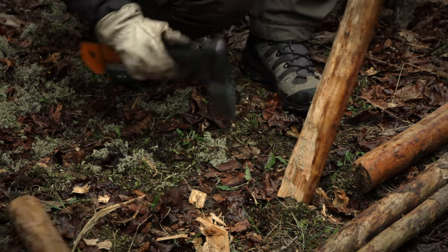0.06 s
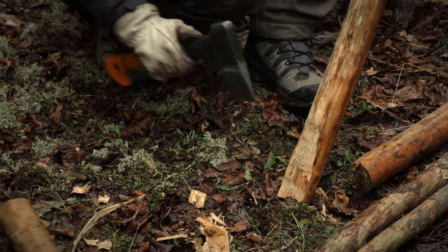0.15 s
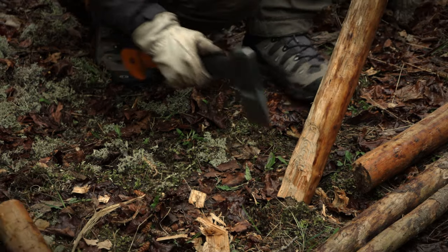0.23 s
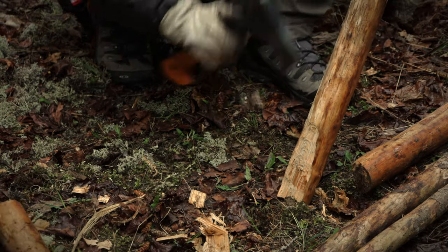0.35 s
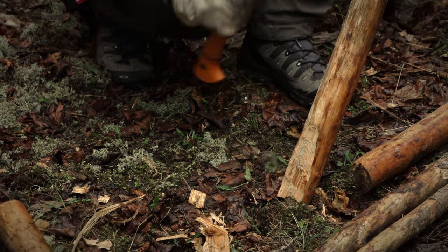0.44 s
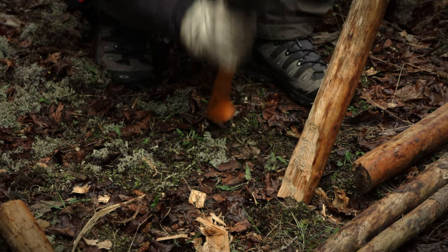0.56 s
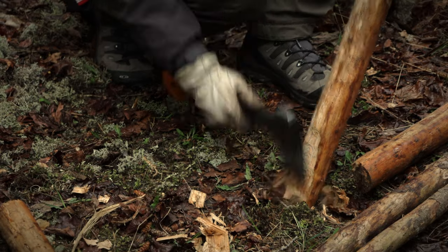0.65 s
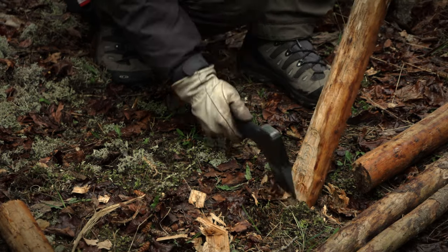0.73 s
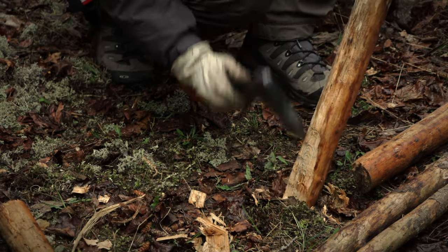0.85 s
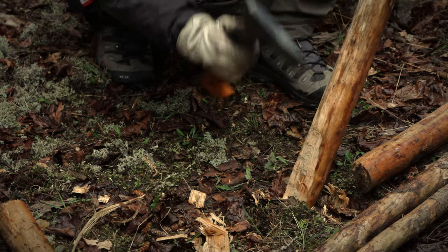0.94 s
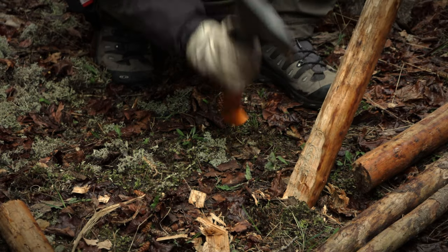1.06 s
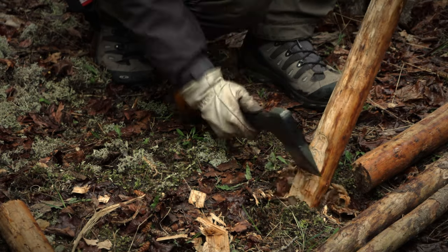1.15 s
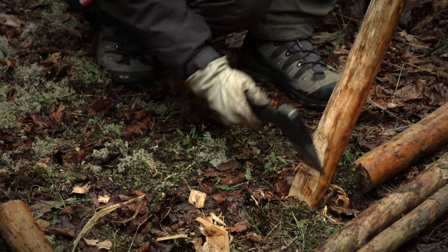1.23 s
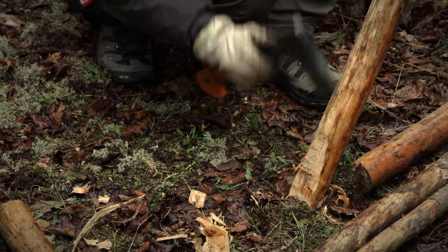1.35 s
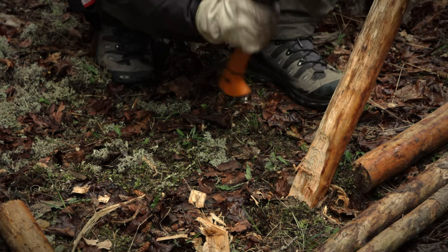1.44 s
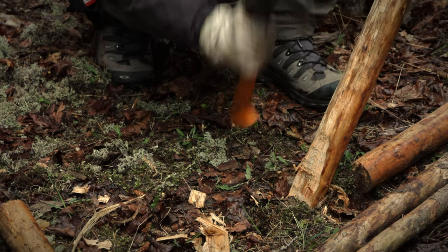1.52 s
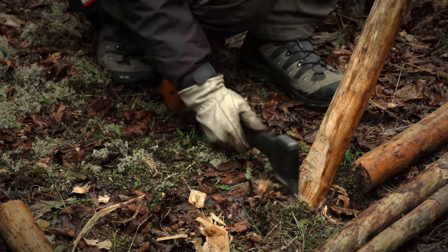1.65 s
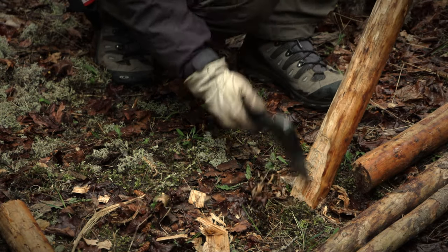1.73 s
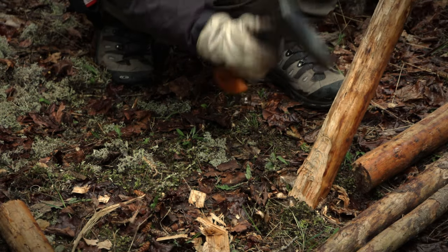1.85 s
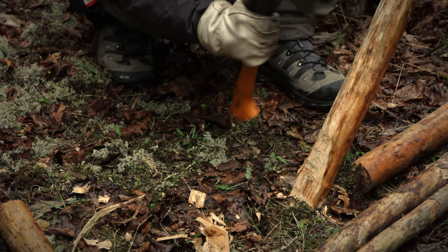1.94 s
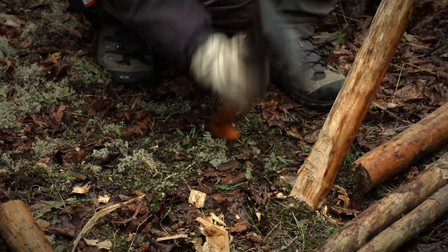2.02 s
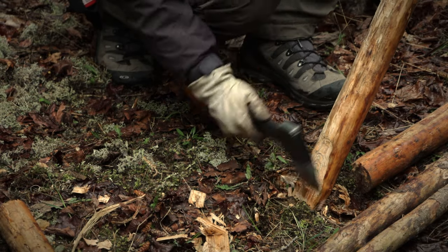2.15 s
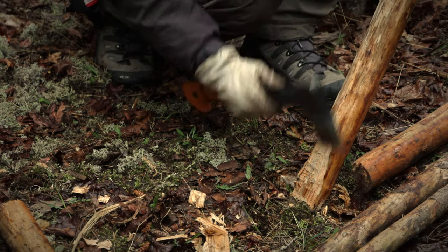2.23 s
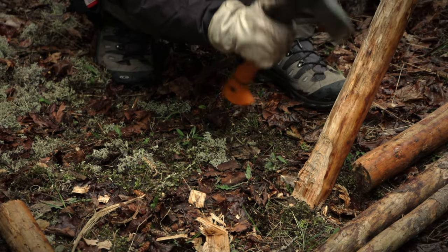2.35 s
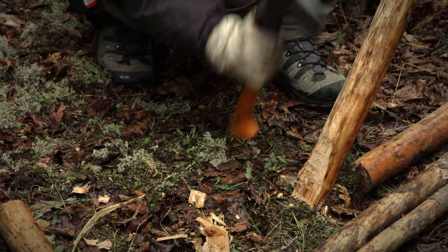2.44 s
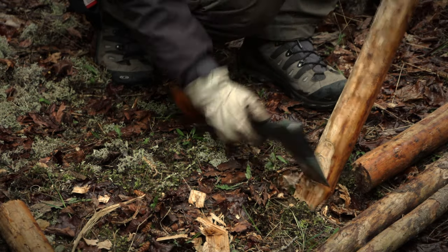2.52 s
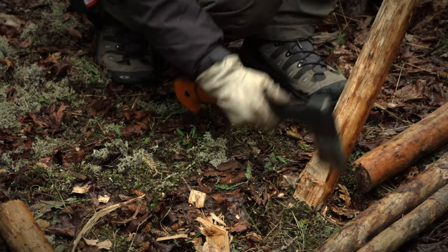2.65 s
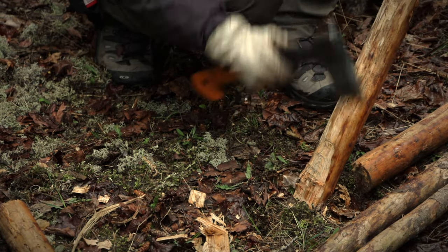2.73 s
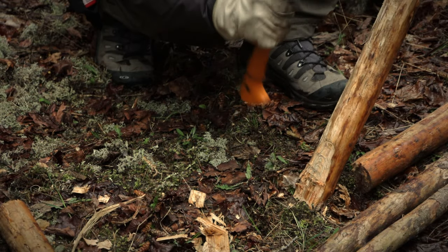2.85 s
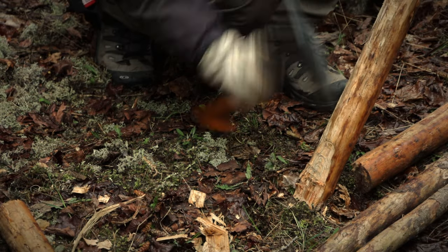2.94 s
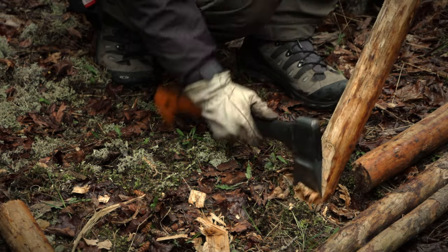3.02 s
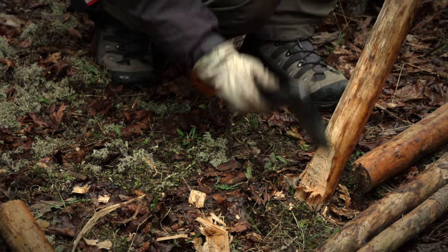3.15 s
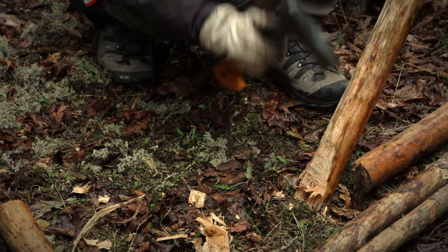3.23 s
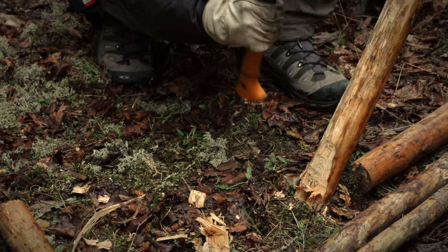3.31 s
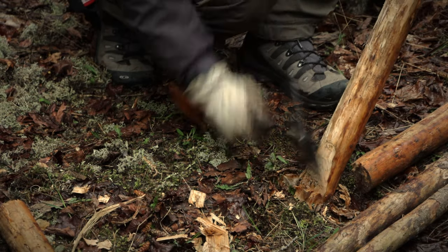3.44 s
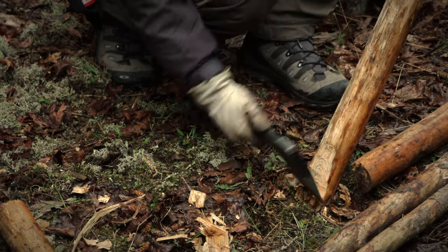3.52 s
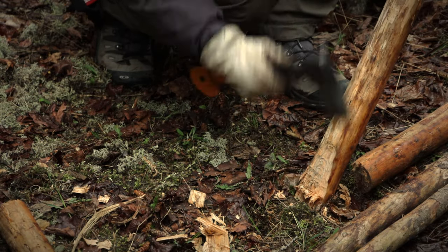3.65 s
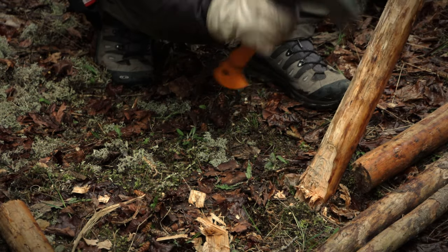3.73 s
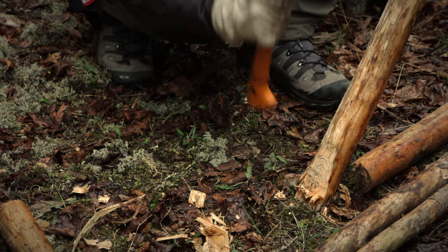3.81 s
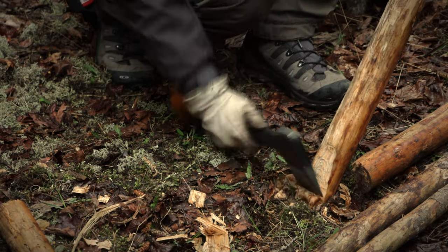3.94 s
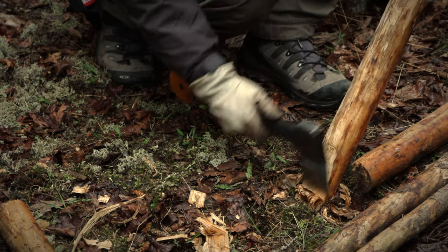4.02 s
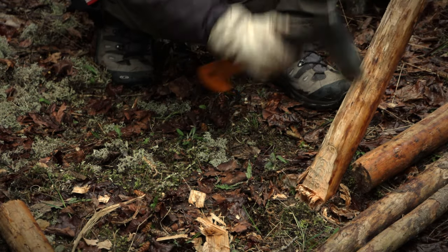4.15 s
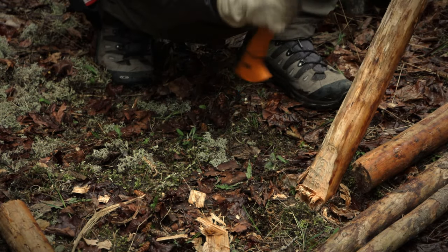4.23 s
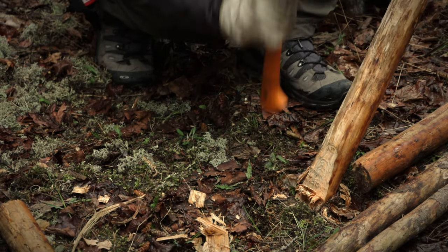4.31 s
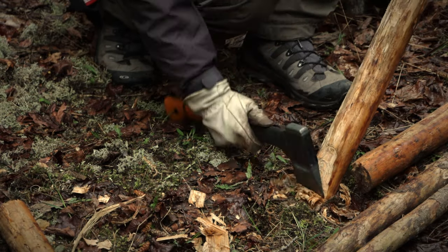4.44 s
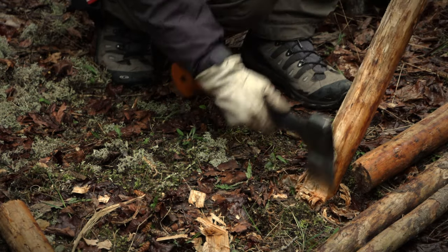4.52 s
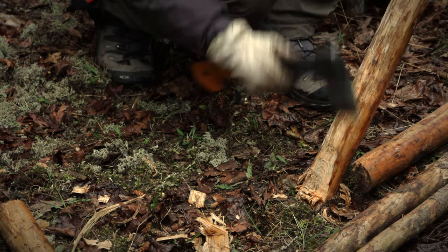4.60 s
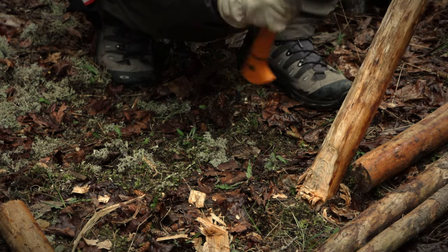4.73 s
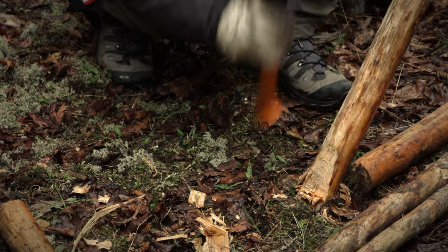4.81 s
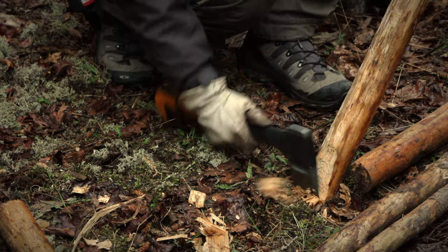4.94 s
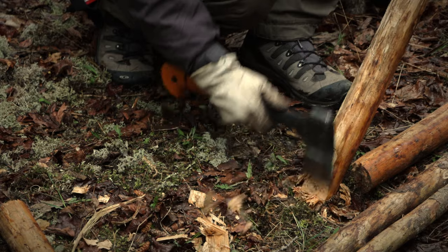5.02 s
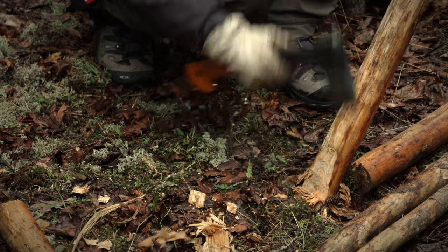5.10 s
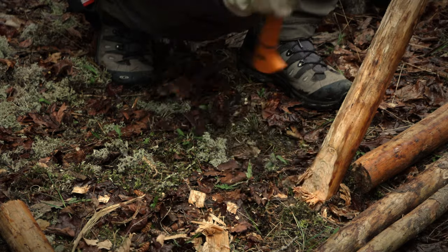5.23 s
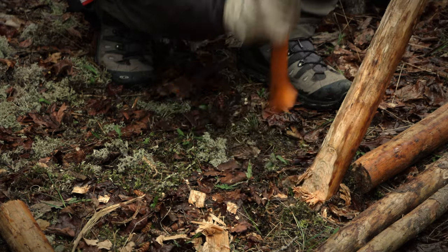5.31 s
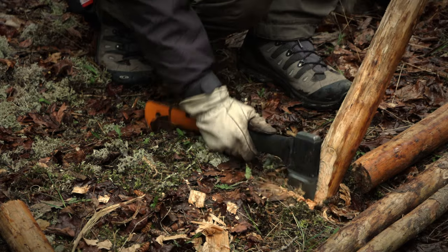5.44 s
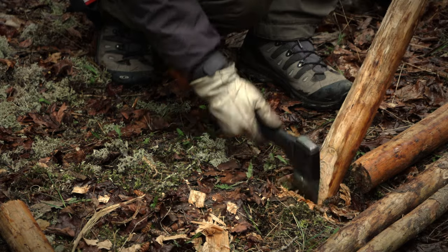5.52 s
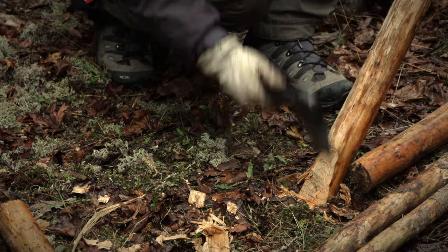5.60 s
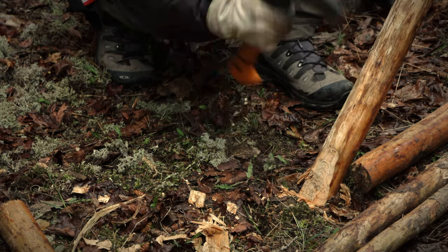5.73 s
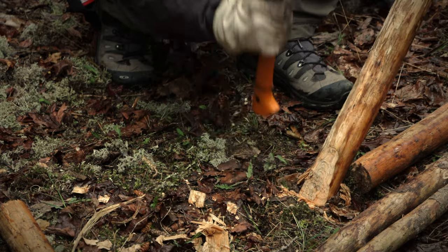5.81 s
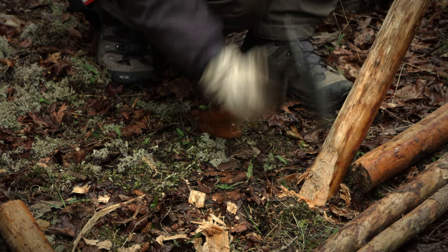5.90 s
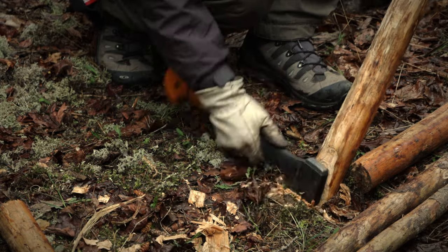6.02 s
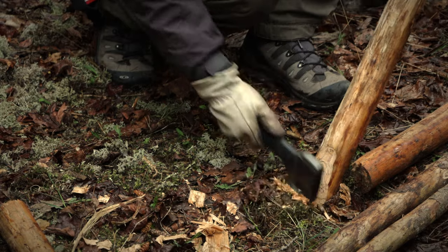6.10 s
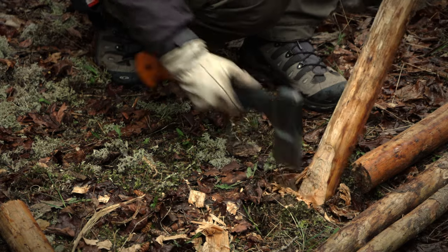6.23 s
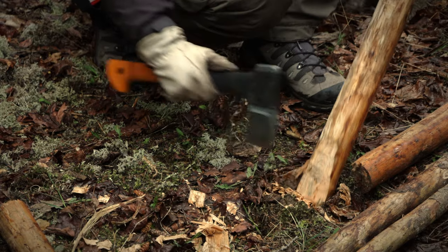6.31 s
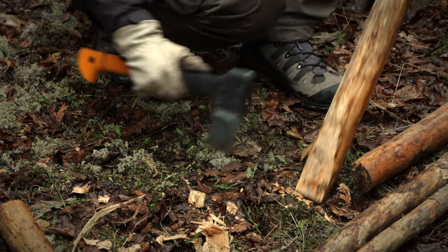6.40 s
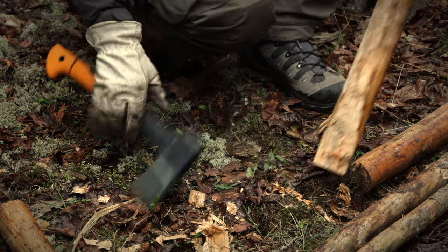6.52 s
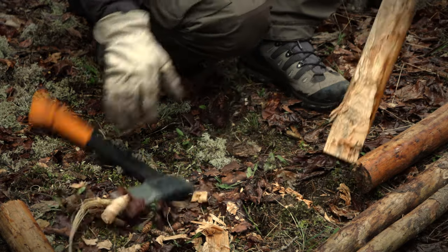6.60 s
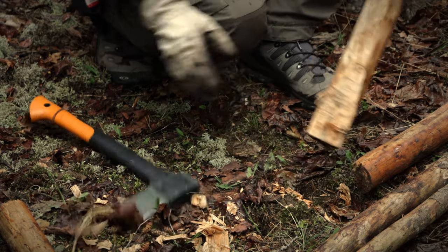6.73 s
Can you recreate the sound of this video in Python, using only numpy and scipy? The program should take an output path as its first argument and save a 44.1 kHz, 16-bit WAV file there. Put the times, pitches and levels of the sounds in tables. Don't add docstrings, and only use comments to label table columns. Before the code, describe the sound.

A quiet forest, heard from about a metre away: soft wind in the crowns and a barely audible low motor far off, mostly at the start and end. Sleeve and leaves rustle until 0.4 s, with a few chip ticks. The first, weaker chop lands at 0.7 s, then eleven stronger ones at nearly even half-second spacing, from 1.2 to 6.0 s. Each is a sharp, dry crack of tearing fibres on a short, choked wooden knock with a small ground thud, varying in pitch and brightness; a brief diffuse echo returns from the trees. Between blows chips tick on dry leaves, air swishes faintly, and the edge briefly scrapes bark, most clearly just before the last blow. Around 6.25 s cloth and leaves rustle; at 6.65 s the hatchet drops with a leafy crunch and dull low bumps, rocking and settling by 6.75 s.

```python
import sys
import numpy as np
from scipy import signal
from scipy.fft import rfft, irfft
from scipy.io import wavfile
from scipy.ndimage import uniform_filter1d

SR = 44100
rng = np.random.default_rng(int(sys.argv[2]) if len(sys.argv) > 2 else 0)


def digitize_waveform(pressure):
    field = np.atleast_2d(pressure).T
    bounded = np.clip(field, -1, 1)
    quanta = np.round(bounded * 32767).astype(np.int16)
    wavfile.write(sys.argv[1], SR, quanta)


def invert_db(x):
    u = np.asarray(x, float) / 20
    return 10 ** u


N = 298116

# pitch_hz, level_db (per Hz)
WIND_COLOUR = [(14, -22), (30, -10), (60, -5.5), (122, -3), (210, -7), (330, -4.5), (740, -2.5), (1050, -5),
               (1500, -12), (4000, -17), (8600, -19), (9600, -22.5), (14800, -23.5), (16500, -37.5)]
WIND_DB = -55
# time_s, level_db
MOTOR_LEVELS = [(0, -69), (.7, -66.5), (1.3, -82), (3, -87), (5.8, -91), (6.4, -67.5), (6.76, -64)]
MOTOR_HZ = 124
# pitch_hz, level_db
TREELINE_COLOUR = [(500, -19), (1100, -0.5), (1450, -5), (1750, 2), (2100, -11), (2900, -12), (3300, -3),
                   (3800, -21.5)]
TREELINE_DB, TREELINE_LATE_S, TREELINE_SPREAD_S = -55.5, 0.098, 0.047
# pitch_hz, level_db
ECHO_COLOUR = [(150, 3), (500, 9), (1700, 3), (4000, -0.5), (9000, -5.5), (15000, -26)]
ECHO_DB, ECHO_NOTE_DB, ECHO_T60_S = -43, -7, 0.39
ECHO_FOLLOWS = 0.19
# loudest_s, level_db, rise_s (by 20 dB), sink_s (by 20 dB), top_db (relative)
RUSTLES = [(.005, -52, .05, 0.03, -3.5), (.175, -54, -0.08, -0.04, -2), (.262, -47.5, 0.13, .11, -9),
           (.335, -61, 0.3, 0.3, -2), (6.22, -51.5, 0.26, 0.17, -17), (6.265, -43, 0.18, .018, -3),
           (6.39, -55, 0.05, 0.23, -6), (6.55, -57.5, 0.05, .15, -4)]
# loudest_s, level_db, rise_s, sink_s, top_db
DROP = [
    (6.654, -39, 0.023, 0.055, -3),
    (6.677, -38.5, 0.032, 0.023, -8),
    (6.72, -39.5, 0.0065, 0.03, -2),
]
# start_s, peak_db, pitch_hz, t60_s
BUMPS = [(5.948, -40.5, 306, 0.037), (5.958, -42, 175, .06), (6.657, -43, 75, 0.16),
         (6.681, -37, 80.3, 0.2), (6.729, -39, 105, 0.11)]
# start_s, peak_db, pitch_hz
CHIPS = [(0.015, -43, 1000), (0.0835, -41, 1530), (0.298, -33, 6900), (0.573, -40.5, 2970),
         (0.618, -43, 8400), (0.6713, -40, 6280), (0.688, -38, 8400), (1.5237, -40.5, 2180),
         (1.5843, -43.5, 2030), (1.822, -42, 4410), (1.892, -42, 6430), (2.0194, -38.5, 3770),
         (2.1195, -36, 8000), (2.3451, -40.5, 2600), (2.7614, -40.5, 1510), (2.9376, -43, 2240),
         (3.0001, -44, 4500), (3.316, -43, 3130), (3.7737, -42.5, 5120), (3.8887, -39.5, 6700),
         (4.196, -40, 6100), (4.2666, -44, 2820), (4.8495, -43.5, 2600), (5.1933, -38, 3300),
         (5.2034, -37.5, 9800), (5.3175, -31, 4030), (5.3294, -41.5, 1600), (5.4408, -39, 2020),
         (5.7735, -43, 6460), (5.8408, -35, 2910)]
# pitch_hz, level_db
CHIP_SHELF = [(300, 0), (8700, 0), (9700, -8), (20000, -10)]
# start_s, level_db, change_db (by the blow), top_db (relative)
SCRAPES = [(1.1965, -42, -9, -1.5), (2.129, -49, -0.5, 3), (2.567, -42, -3, -2.5), (5.442, -58, -5, 1),
           (6.012, -56, 7, 2), (6.0301, -37.5, 17, -4)]
SCRAPE_RING_HZ, SCRAPE_RING_DB = 1200, -7
# pitch_hz, level_db
SWISH_COLOUR = [(600, -8), (1100, 0), (1900, -4), (2800, -7), (4500, -11)]
SWISH_DB, SWISH_RISE_S = -55.5, 0.11

# start_s, strength_db, place (along the pole, 0-1), ground_db, hum_db
BLOWS = [(0.723, -26, 0.23, -46, -45.5), (1.22, -16.5, .97, -32, -38.5), (1.683, -16, 0.49, -30, -43.5),
         (2.161, -22.5, 0.57, -23.5, -40), (2.606, -15.5, 0.66, -21, -37), (3.066, -16, 0.09, -42, -53),
         (3.542, -13.5, .47, -18.5, -37), (4.016, -13, 0.72, -46, -36), (4.5, -12.5, 0.96, -20.5, -41),
         (4.984, -13, 0.48, -27, -38.5), (5.504, -14.5, 0.58, -32, -44), (6.033, -11, .87, -27, -46.5)]
# crack_db, cut_ms, die_s, slip_ms (first slip), splinter_hz
CUTS = [(-10, 1.7, .075, 9.3, 6500), (-1.5, 2.55, 0.019, 2.43, 3080), (-6.5, 1.4, 0.063, 3.85, 8600),
        (-5, 2.05, 0.03, 3.34, 7100), (-5.5, 1.7, 0.031, 1.92, 3420), (-10, 2.3, 0.042, 2.61, 2850),
        (-4, 2.5, .028, 4, 6600), (-5.5, 2.2, .028, 5, 1570), (-2.5, 3, .038, 3.66, 2800),
        (-13, 8.6, 0.046, 3.22, 1570), (-5, 4, 0.036, 3.26, 2070), (-6, 3, 0.038, 5.3, 3280)]
# pitch_hz, level_db, t60_s
LOW_BEND = [(318, 0, 0.061), (381, -1, 0.043), (480, -10, 0.1)]
MIDDLE_BEND = [(645, -3.5, 0.041), (558, -3, 0.016), (762, -8.5, 0.046)]
HIGH_BENDS = [(858.4, 6.5, 0.049), (995, 9.5, 0.05)]
UPPER_BENDS = [(1168, 2, 0.047), (1344, 5.5, 0.052), (1450, -7, 0.025), (1767, 0.5, 0.041)]
# pitch_hz, level_db, t60_s
GROUND = [(151.3, -0.5, 0.19), (186, 0, 0.061), (122, -6.5, 0.067)]
DEEP_GROUND = [(92, 0, 0.23)]
FOOT = [(191, 0, 0.21)]
BEND_DB = [.5, 5, 0.8, -1.6]
NODE_LEAK = 0.11
DEEP_DB, FOOT_DB = -40, -33
SLIP_SHARE, LAST_SLIP_LATER, LAST_SLIP_SHARE = 0.37, 2.296, 0.27
HUM_HZ, HUM_T60_S = 247, 0.4
# pitch_hz, level_db (per Hz)
FIBRES = [(450, -11.5), (900, 6.5), (1600, -0.5), (2900, 1), (4500, -1), (6000, -9)]
# pitch_hz, level_db (per Hz)
FIBRE_TOPS = [(4000, -19), (6300, -4.5), (8200, -2), (9500, -12.5), (13500, -7), (16000, -31)]
SPLINTER_DB = -3
TOP_DB, DULLER_DB_PER_S = -6.5, -1.35
THIN_HZ = 105
LIMIT = 0.6


def colour(x, points):
    hz, db = np.transpose(points)
    f = np.maximum(np.arange(len(x) // 2 + 1) * SR / len(x), 1)
    gain_db = np.interp(np.log(f), np.log(hz), db, left=db[0] - 37, right=db[-1] - 11)
    y = irfft(rfft(x) * invert_db(gain_db), len(x))
    return y / np.sqrt(np.mean(y ** 2))


def fade(size, t60):
    return np.exp(-np.log(1000) * np.arange(size) / SR / max(t60, 0.002))


def ring(modes, size, detune):
    t = np.arange(size) / SR
    out = np.zeros(size)
    for (hz, db, t60), factor in zip(modes, detune):
        out += invert_db(db) * fade(size, t60) * np.sin(2 * np.pi * hz * factor * t)
    return out


def add(out, s, x):
    i = int(s * SR)
    out[i:i + len(x)] += x[:N - i]


def peak(x, db):
    return x * invert_db(db) / np.max(np.abs(x))


def walk(rate):
    k = int(SR / rate)
    steps = np.repeat(rng.standard_normal(N // k + 1), k)
    return 1.46 * uniform_filter1d(uniform_filter1d(steps, k), k)[:N]


def crackle(size, spiky_db):
    return rng.standard_normal(size) * invert_db(spiky_db * rng.exponential(size=size))


def note(hz, db, size):
    band = [(hz * 0.7, -20), (hz * 0.94, 0), (hz * 1.06, 0), (hz * 1.4, -20)]
    return invert_db(db) * colour(crackle(size, 3.0), band)


def wind():
    spectrum = rfft(colour(rng.standard_normal(N), WIND_COLOUR))
    f = np.maximum(np.arange(N // 2 + 1) * SR / N, 1)
    swell_db = 0.4 * walk(0.8)
    out = np.zeros(N)
    for hz in 20 * 2.0 ** np.arange(11):
        share = np.maximum(1 - np.abs(np.log2(f / hz)), 0)
        out += irfft(spectrum * share, N) * invert_db(swell_db + 0.24 * walk(6.5))
    return invert_db(WIND_DB) * out


def far_motor():
    s, db = np.transpose(MOTOR_LEVELS)
    level = invert_db(np.interp(np.arange(N) / SR, s, db) + 2.0 * walk(6))
    pitch_hz = MOTOR_HZ * (1 + 0.011 * walk(4))
    return np.sqrt(2) * level * np.sin(2 * np.pi * np.cumsum(pitch_hz) / SR)


def treeline():
    t = np.arange(SR // 4) / SR
    blur = np.exp(-((t - TREELINE_LATE_S) / TREELINE_SPREAD_S) ** 2 / 2)
    level = np.zeros(N)
    for s, strength_db, *_ in BLOWS:
        add(level, s, invert_db(TREELINE_DB + strength_db + 12) * blur)
    return level * colour(crackle(N, 1.7), TREELINE_COLOUR)


def echo(strength_db, splinter_hz, size):
    wash = colour(rng.standard_normal(size), ECHO_COLOUR) + note(splinter_hz, ECHO_NOTE_DB, size)
    rise = np.minimum(np.arange(size) / SR / 0.009, 1)
    return invert_db(ECHO_DB + ECHO_FOLLOWS * (strength_db + 15)) * rise * fade(size, ECHO_T60_S) * wash


def rubbing():
    low_points = [(300, -15), (700, 0), (1500, 1.0), (3600, -0.5), (6000, -4), (8000, -7.0)]
    high_points = [(4500, -25), (6500, -1.5), (8500, -2.0), (10000, -8.5), (15500, -9.5)]
    low = colour(crackle(N, 2.0), low_points)
    high = colour(crackle(N, 1.4), high_points)
    bark = low + note(SCRAPE_RING_HZ, SCRAPE_RING_DB, N)
    out, t = np.zeros(N), np.arange(N) / SR
    for s, db, rise_s, sink_s, top_db in RUSTLES + DROP:
        level = invert_db(db - 20 * np.maximum((s - t) / rise_s, (t - s) / sink_s))
        out += level * (low + invert_db(top_db) * high)
    for s, db, change_db, top_db in SCRAPES:
        bite_s = min(blow[0] for blow in BLOWS if blow[0] > s)
        level = invert_db(np.interp(t, [s, bite_s], [db, db + change_db], left=-150, right=-150))
        out += level * (bark + invert_db(top_db) * high)
    return out * invert_db(1.4 * walk(300))


def bumps():
    out = np.zeros(N)
    for s, db, hz, t60 in BUMPS:
        body = ring([(hz, 0, t60), (hz * 2.34, -8, t60 * 1.1)], 8192, [1, 1])
        push = np.hanning(int(SR / hz / 3))
        add(out, s, peak(np.convolve(push, body), db))
    return out


def chips():
    out = np.zeros(N)
    faint = rng.random((220, 3)) * [N / SR, 9, 2.2] + [0, -56, 0]
    faint[:, 2] = 2000 * 2 ** faint[:, 2]
    for s, db, hz in list(CHIPS) + list(faint):
        band = [(hz / 3, -16), (hz, 0), (hz * 2.48, -13)]
        spit = colour(colour(rng.standard_normal(512), band), CHIP_SHELF)
        add(out, s, peak(spit * fade(512, 0.02), db))
    return out


def swishes():
    t = np.arange(SR // 4) / SR
    level = np.zeros(N)
    for s, *_ in BLOWS:
        add(level, s - 1 / 4, invert_db(SWISH_DB - 20 * t[::-1] / SWISH_RISE_S))
    return level * colour(rng.standard_normal(N), SWISH_COLOUR)


def jolts(slip_ms):
    force = np.zeros(1024)
    slip = slip_ms * SR / 1000
    force[[0, int(slip), int(slip * LAST_SLIP_LATER)]] = 1, SLIP_SHARE, LAST_SLIP_SHARE
    return np.convolve(force, np.hanning(22))


def wood_and_ground(strength_db, place, ground_db, slip_ms, size):
    t = np.arange(size) / SR
    force = jolts(slip_ms)
    shape = np.abs(np.sin(np.pi * (np.arange(1, 5) * place + 1 / 4)))
    bend_db = strength_db + np.array(BEND_DB) + 20 * np.log10(shape + NODE_LEAK)
    groups = LOW_BEND, MIDDLE_BEND, HIGH_BENDS, UPPER_BENDS, GROUND, DEEP_GROUND, FOOT
    out = np.zeros(size)
    for modes, db in zip(groups, [*bend_db, ground_db, DEEP_DB, FOOT_DB]):
        lowest_hz = modes[0][0]
        detune = 1 + 0.008 * rng.standard_normal(len(modes))
        swing = signal.fftconvolve(force, ring(modes, size, detune))[:size]
        high_pass = signal.butter(2, 0.37 * lowest_hz, "high", fs=SR, output="sos")
        swing = signal.sosfilt(high_pass, swing)
        if lowest_hz > 100:
            swing = swing * (0.1 + 0.9 * np.exp(-(t * (lowest_hz / 600) ** 0.3 / 0.018) ** 2))
        out += peak(swing, db + 5.5)
    return out


def tearing(out, s, crack_db, cut_ms, die_s, splinter_hz, size):
    t = np.arange(size) / SR
    tear = np.minimum(t / 0.001, 1)
    tear = tear * np.exp(-np.log(1000) * np.maximum(t - cut_ms / 1000, 0) / die_s)
    add(out, s + 0.001, invert_db(crack_db - 13) * tear * note(splinter_hz, SPLINTER_DB, size))
    tear = tear + invert_db(-24.0) * fade(size, 0.21)
    bursts = np.interp(t, np.arange(500) / 1000, invert_db(3.5 * rng.standard_normal(500) - 1.5))
    body = tear * bursts * colour(crackle(size, 2.53), FIBRES)
    top = tear ** 1.055 * bursts * colour(crackle(size, 3.3), FIBRE_TOPS)
    top_db = crack_db + TOP_DB + DULLER_DB_PER_S * s
    add(out, s + 0.0004, invert_db(crack_db - 9.5) * body + invert_db(top_db - 1.0) * top)


def chops():
    out, size = np.zeros(N), SR // 2
    hum = ring([(HUM_HZ, -1, HUM_T60_S), (HUM_HZ, -9, 0.2)], size, [1, 1.05])
    for blow, cut in zip(BLOWS, CUTS):
        s, strength_db, place, ground_db, hum_db = blow
        crack_db, cut_ms, die_s, slip_ms, splinter_hz = cut
        add(out, s + 0.00037, wood_and_ground(strength_db, place, ground_db, slip_ms, size))
        tearing(out, s, crack_db, cut_ms, die_s, splinter_hz, size)
        add(out, s, invert_db(hum_db) * hum)
        add(out, s, echo(strength_db, splinter_hz, size))
    return out


def scene():
    thin = signal.butter(3, THIN_HZ, "high", fs=SR, output="sos")
    background = wind() + far_motor() + treeline()
    near = rubbing() + bumps() + chips() + swishes()
    return (background + near + signal.sosfilt(thin, chops()))[None]


def band_limit(x):
    return signal.sosfilt(signal.butter(12, 16840, fs=SR, output="sos"), x)


def record(dry):
    top = signal.ellip(8, 0.2, 60, 16000, fs=SR, output="sos")
    rounded = LIMIT * np.tanh(dry / LIMIT)
    return band_limit(signal.sosfilt(top, rounded))


dry = scene()
out = record(dry)
digitize_waveform(out)
```